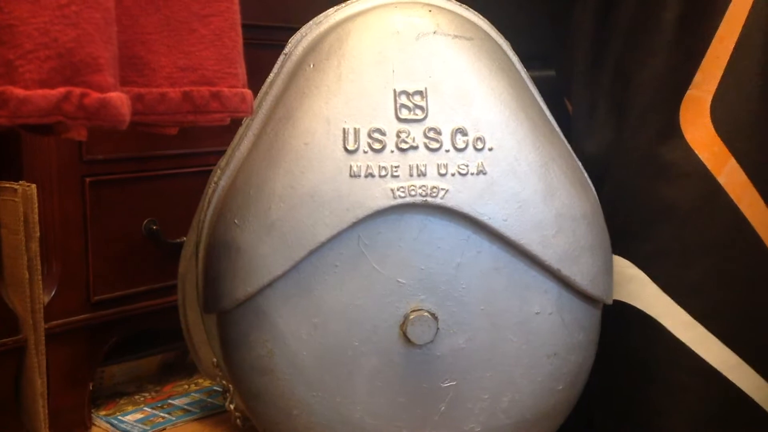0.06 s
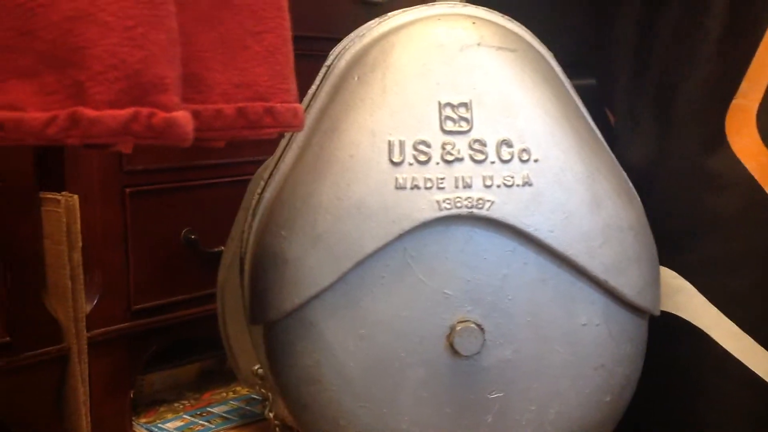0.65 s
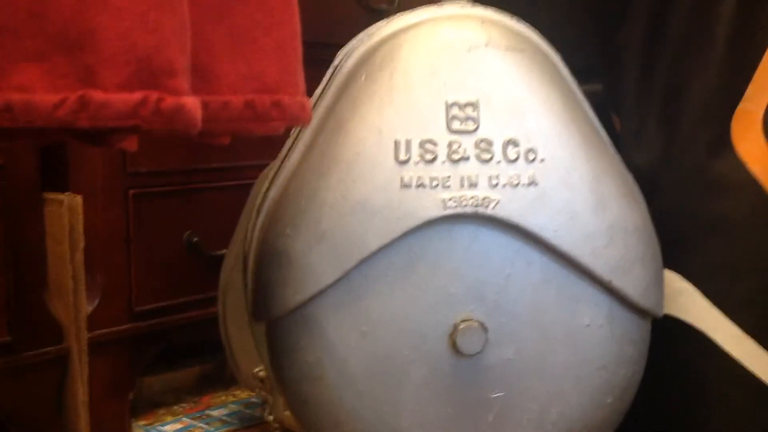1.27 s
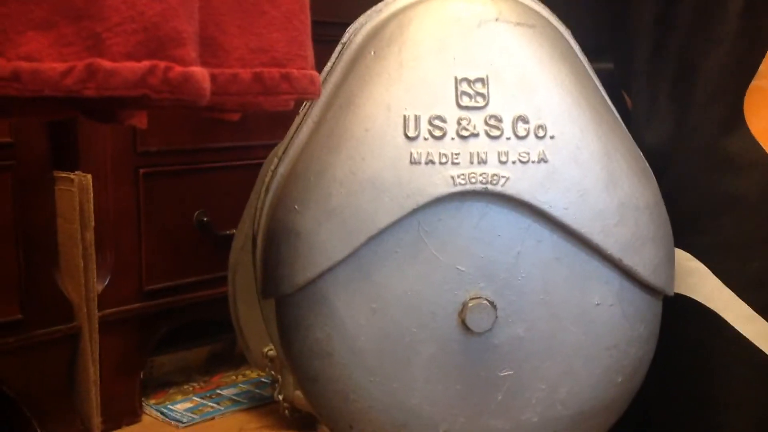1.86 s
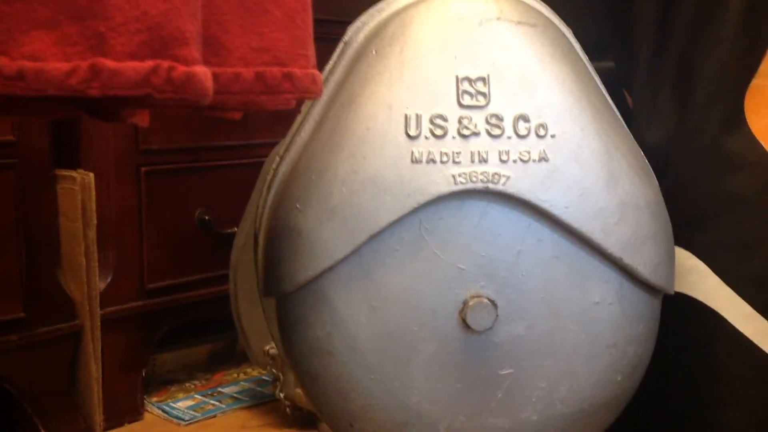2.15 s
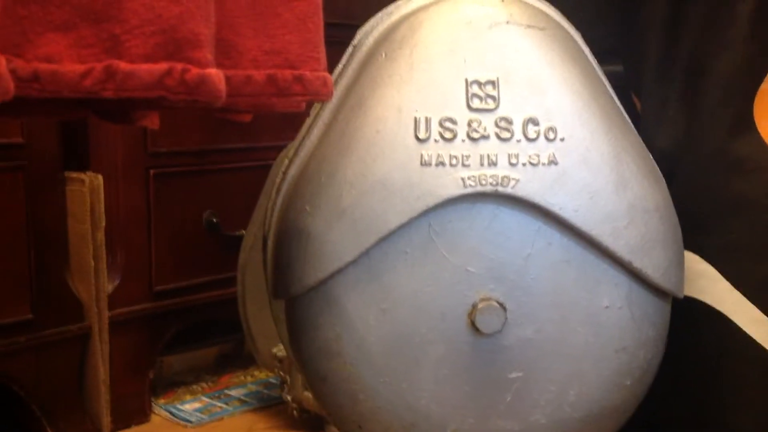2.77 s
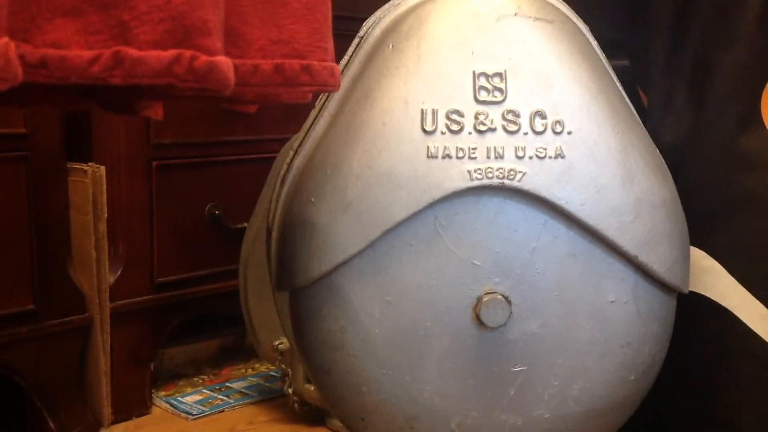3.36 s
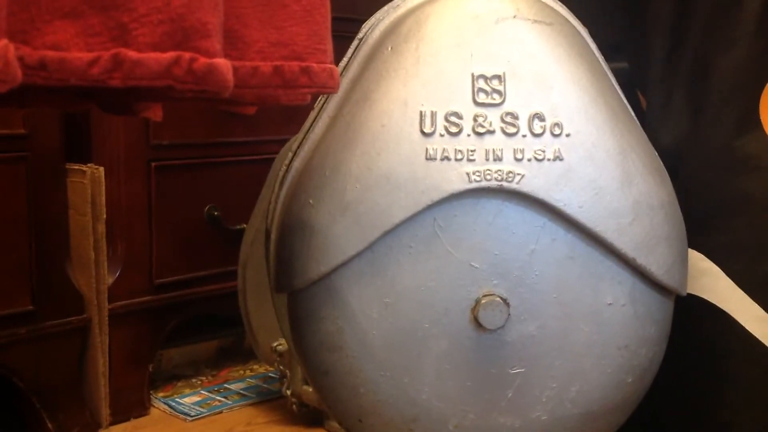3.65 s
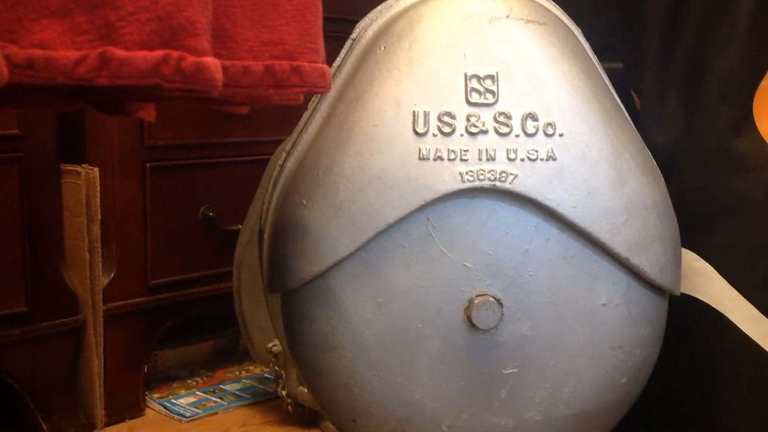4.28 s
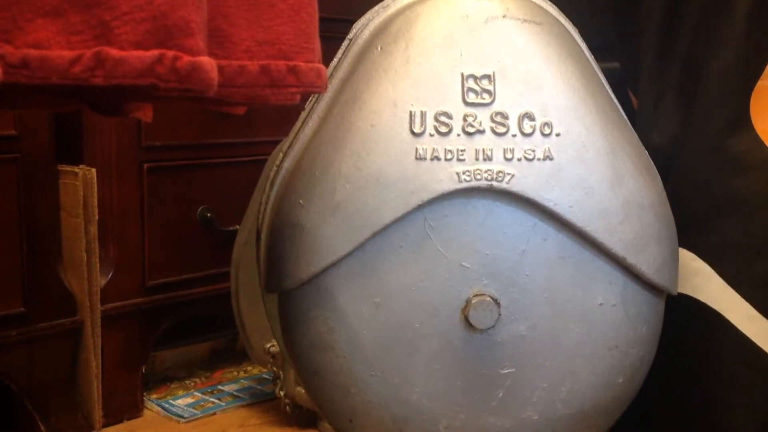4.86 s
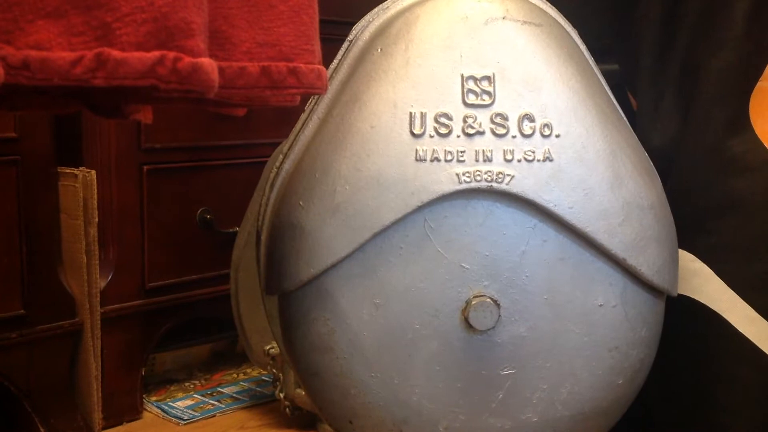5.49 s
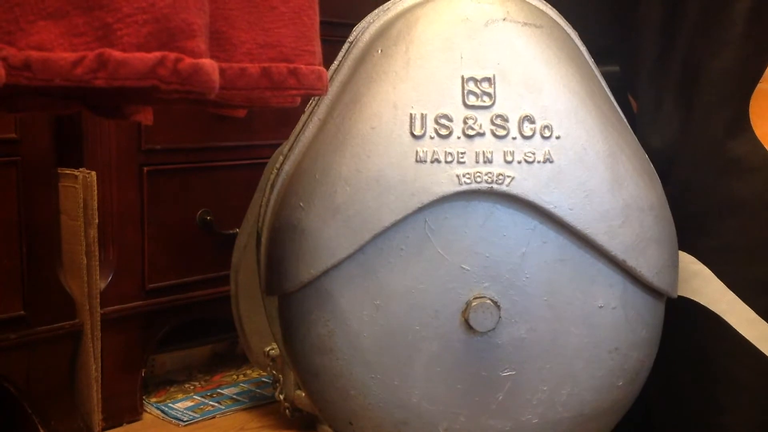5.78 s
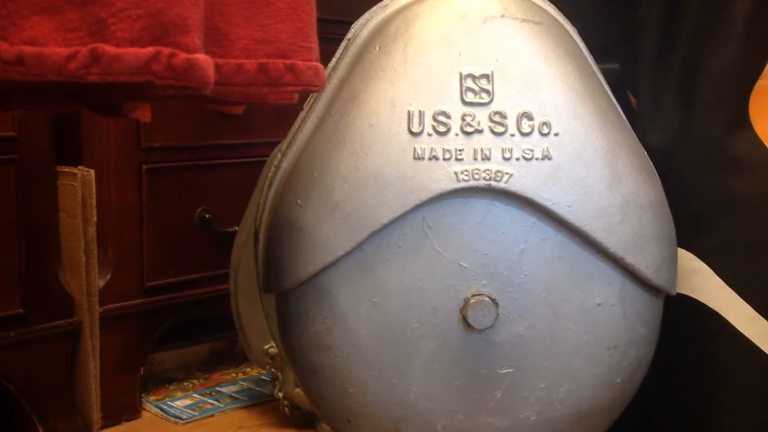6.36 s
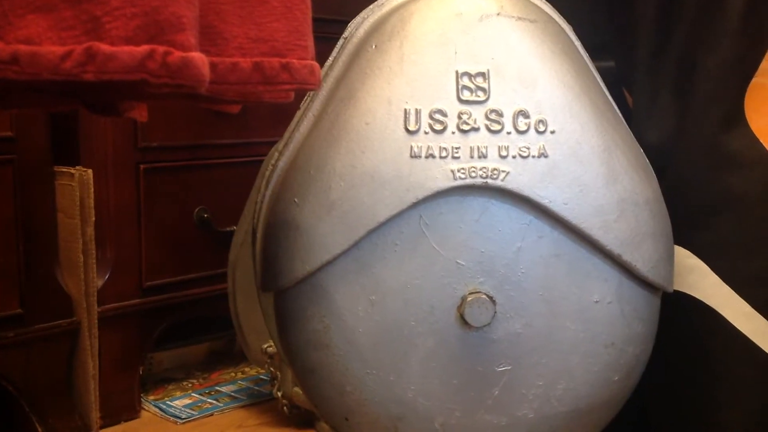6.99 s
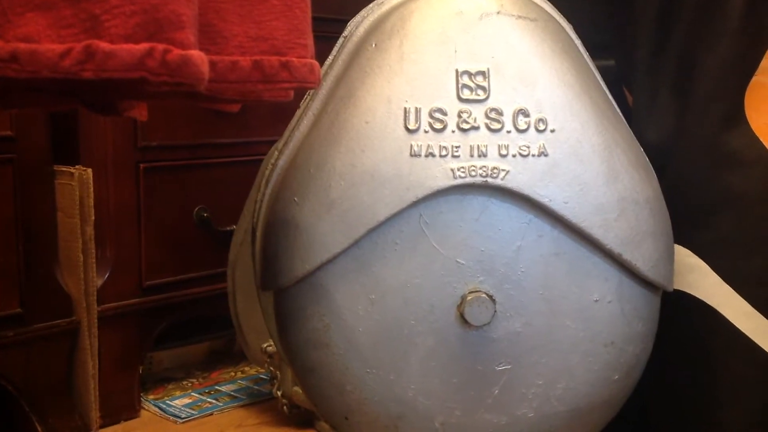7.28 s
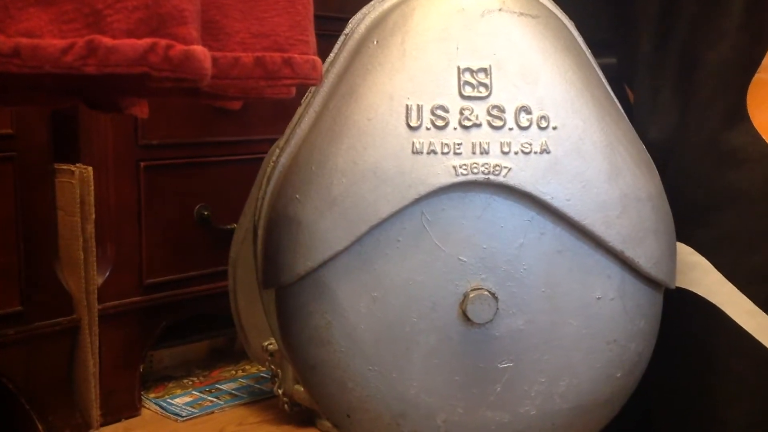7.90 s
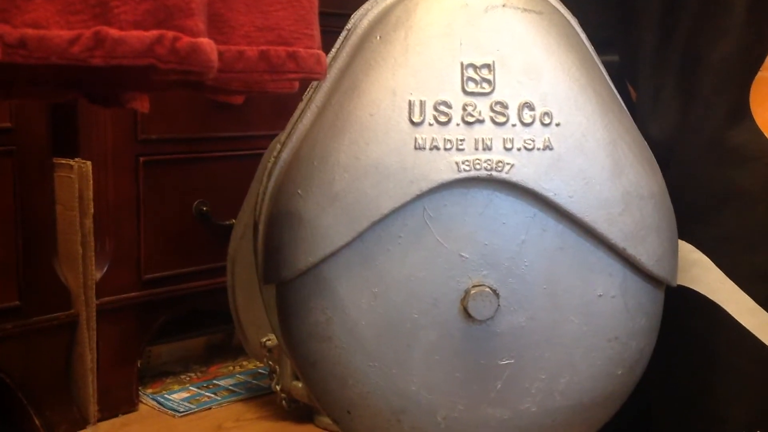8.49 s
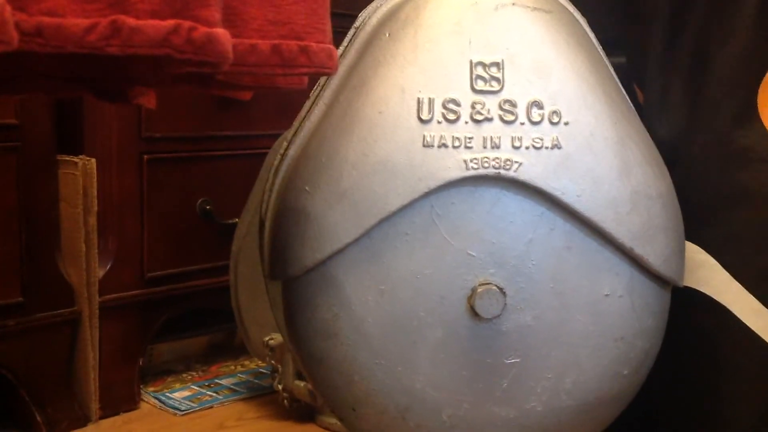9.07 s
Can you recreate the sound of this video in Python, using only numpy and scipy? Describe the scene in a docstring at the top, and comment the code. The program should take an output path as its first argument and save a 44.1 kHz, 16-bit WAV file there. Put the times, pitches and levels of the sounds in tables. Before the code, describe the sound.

A railroad crossing bell starts ringing at once, close to the microphone in a quiet furnished room. The hammer hits the metal gong evenly, about three times a second. Each blow gives a bright clang with a short room echo, and the mechanism clacks just before and after it. A deep hum runs underneath, dipping briefly under each strike. The loose linkage rattles hard at about 0.2 seconds and chatters lightly until about 1.5 seconds. The steady clanging continues, with a second hard rattle and a weaker blow near 4.9 seconds. The last strike lands at about 7.1 seconds, and the mechanism drops to rest with a softer clack near 7.9 seconds. The high ringing fades quickly, while the gong's low tone hums on, slowly wavering.

```python
"""A furnished room, one microphone close to an electromechanical railroad crossing bell.
About three times a second the armature pulls in with a clack, the hammer hits the gong and the armature
drops back; the linkage chatters at first and twice rattles hard. Each blow sets off a bright clang, which
echoes in the room, over a deep hum. The blows stop and the gong hums on, beating slowly.
A limiter behind the microphone ducks the hum under every blow."""
import sys
import numpy as np
from scipy import signal
from scipy.fft import rfft, irfft, next_fast_len
from scipy.io import wavfile
from scipy.ndimage import uniform_filter1d, minimum_filter1d

SR = 44100
rng = np.random.default_rng(int(sys.argv[2]) if len(sys.argv) > 2 else 0)


def bounce(signal):
    """Save signal as a 16-bit WAV file at the path given by the first command-line argument."""
    frames = np.transpose(np.atleast_2d(signal))
    limited = np.clip(frames, -1, 1)
    pcm = np.round(limited * 32767).astype(np.int16)
    wavfile.write(sys.argv[1], SR, pcm)


N = 407477

# colour of the quiet room: freq_hz, gain_db
ROOM_TONE_COLOUR = [(30, -64.5), (100, -58), (170, -46), (400, -51), (1000, -60), (3000, -69), (8000, -65),
                    (15000, -73)]
# how long the case and room keep a sound alive: freq_hz, t60_s
ROOM_DECAY = [(150, 0.56), (700, 0.53), (3000, 0.25), (7000, .23), (14000, 0.098)]
# two hard rattles: start_s, length_s, level_db
HARD_RATTLES = [(0.193, 0.065, 7), (4.92, 0.056, 7)]
# colour of the loose metal part that rattles: freq_hz, gain_db
LOOSE_PART_COLOUR = [(300, -42.5), (1500, -23.5), (3000, -20.5), (4200, -15), (5400, -7.5), (6600, -15),
                     (8500, -29), (12000, -30.5), (15000, -38)]
# colour of the armature pulling in: freq_hz, gain_db
PULL_IN_COLOUR = [(40, -46.5), (110, -38), (165, -21.5), (230, -31), (340, -8), (480, -37.5), (800, -26),
                  (3400, -22), (4250, -16.5), (4900, -25.5), (7000, -24), (8500, -17.5), (11000, -29.5),
                  (15000, -38.5)]
# colour of the armature dropping back: freq_hz, gain_db
DROP_BACK_COLOUR = [(40, -46), (110, -40), (165, -20), (220, -28), (320, -11.5), (480, -37), (850, -25.5),
                    (2300, -22.5), (3000, -23.5), (3800, -24.5), (5300, -20.5), (7400, -23.5), (7550, -10),
                    (7700, -21), (10000, -28), (15000, -36.5)]
# colour of the hammer meeting the gong: freq_hz, gain_db
HAMMER_COLOUR = [(40, -29.5), (110, -28), (160, -11), (210, -21), (310, -1), (500, -23), (900, -13),
                 (1450, -12.5), (1900, 1.5), (2300, -11.5), (2900, -12), (3300, -3), (3700, -6.5),
                 (5500, -2), (8000, -13), (11000, -29), (15000, -32.5)]
# each blow meets a moving rim, so it feeds or checks the deep hum and the upper ring:
# start_s, force_db, hum_db, ring_db
HAMMER_BLOWS = [(0.0342, 1, -1.5, 4), (0.3733, -2, 2, 1.5), (0.7458, -1.5, -1.5, 1.5),
                (1.0979, 0, -2.5, 1.5), (1.4543, -1.5, 4.5, -3.5), (1.8069, 0, 3.5, -2.5),
                (2.1535, 0.5, -7, 2), (2.4888, 1, -4, 0.5), (2.8329, -1, -6, -5.5), (3.1742, 3, -1, 4),
                (3.5192, 1, 0, 2), (3.88, -.5, -0.5, -1), (4.221, 0.5, 1.5, 2.5), (4.568, 1, -12, 3),
                (4.9107, -5, -11.5, -12), (5.2517, 0, -3.5, 4), (5.6215, 1, 5, -6), (6.0021, -0.5, 7, -8.5),
                (6.3656, 2.5, 0, 1.5), (6.7253, 1.5, 1, -2), (7.094, 1, 6, 6.5)]
# the gong's short bright modes, plus short-lived room resonances that each blow sets ringing near the long
# partials (1300, 1850, 1915, 2535 Hz): pitch_hz, level_db, t60_s
BRIGHT_MODES = [(1300, -17, .28), (1850, -23, .2), (1915, -20, .2), (2011, -28, .9), (2535, -18, .25),
                (3266, -4, .36), (4045, -4.5, .3), (4308, -13, .32), (4886, -9, .29), (5104, -28, .6),
                (5429, -15, .41), (5624, -14, .4), (5777, -6.5, .35), (6210, -13, .22), (6556, -18.5, .38),
                (6742, -10.5, .31), (7062, -19, .25), (7248, -5, .22), (7772, -16, .38), (7795, -14, .37),
                (7820, -10.5, .38), (8539, -9, .22), (8876, -7.5, .22), (9110, -8.5, .2), (9894, -17, .21),
                (10012, -7.5, .19), (10434, -17, .24), (11337, -18, .23), (11466, -17, .23),
                (11778, -22, .21), (12520, -20, .2), (12855, -22, .21), (13068, -16, .21),
                (13890, -22, .21), (14490, -23, .21), (14739, -23, .21)]
# the gong's five long partials, each a beating pair:
# pitch_hz, t60_s, twin_offset_hz, twin_db, twin_t60_s, blow_to_dip_s
LONG_PARTIALS = [(284.3, 18, -0.23, -2.5, 22, 1.715), (733.2, 7.9, -1.1, -7, 9, 0.012),
                 (1278.1, 1.31, -2.5, -13, 3.3, 0.04), (1885.2, 1.49, 3, -8.5, 2.27, 0.0037),
                 (2552.9, 1, -2.5, -6, 1.2, 0.0018)]
# how each long partial answers a blow: level_db, hum_share, ring_share, spread_db
PARTIAL_RESPONSE = [(-22.5, 1, 0, 1.5), (-30, 0.12, 0.5, 1.5), (-6, 0, 0, 1.8), (-10, 0, 0.55, 1.13),
                    (-11, 0, 1, 2.5)]
# slow swells of the second and third long partials: time_s, second_db, third_db
PARTIAL_SWELLS = [(0, -1.5, -4.5), (1.1, -1, -4), (2.15, 2, 4.5), (2.5, 3.5, 2.5), (3.88, 3, 2.5),
                  (4.22, -9, 3.5), (5.62, 3, -6), (6.72, -5.5, 1), (7.09, 0, -5.5)]

CYCLE_S = .353   # usual time from blow to blow
TOP_MODES_HZ, CUTOFF_HZ = 7000, 15300


def from_db(db):
    """Decibels to amplitude."""
    return 10 ** (np.asarray(db) / 20)


def fade(t, t60):
    """A decay of 60 dB in t60 seconds."""
    return np.exp(-np.log(1000) * t / max(t60, 1e-3))


def phasor(turns):
    """A point on the unit circle."""
    return np.exp(2j * np.pi * turns)


def at_hz(points, hz):
    """Read a table on a log-frequency axis."""
    freq_hz, value = np.transpose(points)
    return np.interp(np.log(np.maximum(hz, 1)), np.log(freq_hz), value)


def add(out, start_s, sound):
    """Mix a sound in from start_s on."""
    start = max(round(start_s * SR), 0)
    out[start:start + len(sound)] += sound[:N - start]


def noise(colour, size, gain=1):
    """White noise, times a gain, through a colour."""
    hz = np.arange(size // 2 + 1) * SR / size
    return irfft(rfft(gain * rng.standard_normal(size)) * from_db(at_hz(colour, hz)), size)


def room_tone():
    """The quiet room's steady noise, far below the bell."""
    return noise(ROOM_TONE_COLOUR, next_fast_len(N))[:N]


def die_away(sound):
    """Let a sound die away in the room, treble first."""
    t = np.arange(len(sound)) / SR
    hz = np.arange(len(sound) // 2 + 1) * SR / len(sound)
    centres_hz, t60s = np.transpose(ROOM_DECAY)
    shares = np.array([at_hz(np.c_[centres_hz, one], hz) for one in np.eye(len(centres_hz))])
    bands = irfft(rfft(sound) * shares, len(sound))
    return sum(band * fade(t, t60) for band, t60 in zip(bands, t60s))


def room_echoes(sound, first_echo_s):
    """Dense echoes reach the microphone off the furniture and walls."""
    size = SR // 2
    echoes = die_away(rng.standard_normal(size)) * (np.arange(size) > first_echo_s * SR)
    return signal.fftconvolve(sound, echoes / np.linalg.norm(echoes))[:N]


def linkage_rattles(drops, taps_per_s, spread_db, sag_db, ring_t60):
    """Runs of tiny taps that weaken as they go; all of them ring the same loose metal part."""
    loose_until_s, chatter_s, chatter_db = 1.4, 0.16, -10
    taps, t = np.zeros(N), np.arange(SR // 3) / SR
    decay = fade(t, ring_t60)
    part_ring = noise(LOOSE_PART_COLOUR, len(t)) * decay / np.linalg.norm(decay)
    chatter = [(s, chatter_s, chatter_db) for s, *_ in [*HAMMER_BLOWS, *drops] if s < loose_until_s]
    for start_s, length_s, level_db in HARD_RATTLES + chatter:
        hit = (rng.random(len(t)) < taps_per_s / SR) & (t < length_s) | (t == 0)
        run = hit * rng.choice([-1, 1], len(t)) * from_db(spread_db * rng.standard_normal(len(t)))
        run *= np.sqrt(length_s * SR) / np.linalg.norm(run)
        add(taps, start_s, run * from_db(level_db - sag_db * t / length_s))
    return signal.fftconvolve(taps, part_ring)[:N]


def armature_cycle():
    """The armature pulls in before each blow and drops back after it; two lists of start_s, level_db."""
    pull_lead_s, drop_after_s, drop_db_per_s = .0572, .185, 172
    rest_s, rest_db = 7.86, -7.5   # it falls to rest once the blows have stopped
    blow_s = np.array(HAMMER_BLOWS)[:, 0]
    extra_s = np.diff(blow_s) - CYCLE_S
    pull_s = blow_s - pull_lead_s + .14 * np.r_[0, extra_s]
    drop_s = blow_s + drop_after_s + .8 * np.r_[extra_s, extra_s[-1] / 2]
    drop_db = drop_db_per_s * np.r_[extra_s, 0]   # a longer swing ends in a harder drop
    pulls = np.c_[pull_s, np.zeros(len(pull_s))]
    drops = np.vstack([np.c_[drop_s, drop_db], (rest_s, rest_db)])
    return pulls, drops


def grain(size, grain_db, grain_s):
    """A gain that jumps about from one tiny collision to the next; rms 1."""
    lumps = uniform_filter1d(rng.standard_normal(size), max(round(grain_s * SR), 1))
    gain = from_db(grain_db * np.clip(lumps / lumps.std(), -2.5, 2.5))
    return gain / np.sqrt(np.mean(gain ** 2))


def steel_contacts(hits, colour, crack_db, crack_t60, tail_db, grain_db, alike):
    """Steel meets steel: a short crack, then a grainy tail; a share of the tail is alike each time."""
    out, t = np.zeros(N), np.arange(SR // 2) / SR
    body = noise(colour, len(t))
    for start_s, level_db, *_ in hits:
        crack = from_db(crack_db) * fade(t, crack_t60) * noise(colour, len(t))
        fresh = noise(colour, len(t), grain(len(t), grain_db, grain_s=0.0019))
        tail = from_db(tail_db) * die_away(np.sqrt(alike) * body + np.sqrt(1 - alike) * fresh)
        add(out, start_s, from_db(level_db) * (crack + tail))
    return out


def drive_db(hz, force_db, ring_db):
    """The lower bright modes go with a blow's ring, the top ones with its force."""
    return np.where(hz < TOP_MODES_HZ, 0.53 * ring_db, 2.1 * force_db)


def gong_weak_modes(level_db, rise_db_per_octave, pitch_spread, t60, per_mode):
    """Weak modes cluster around the bright ones, lifted towards the top, other ones on each blow."""
    out, t = np.zeros(N), np.arange(SR // 3) / SR
    hz, mode_db, _ = np.repeat(np.transpose(BRIGHT_MODES), per_mode, axis=1)
    mode_db = mode_db + level_db + rise_db_per_octave * np.log2(hz / TOP_MODES_HZ)
    for start_s, force_db, _, ring_db in HAMMER_BLOWS:
        scattered_hz = np.clip(hz * (1 + pitch_spread * rng.standard_normal(len(hz))), 0, CUTOFF_HZ)
        bins = np.round(scattered_hz * len(t) / SR).astype(int)
        spectrum = np.zeros(len(t) // 2 + 1, complex)
        spectrum[bins] = from_db(mode_db + drive_db(hz, force_db, ring_db)) * phasor(rng.random(len(hz)))
        add(out, start_s, irfft(spectrum, len(t)) * len(t) / 2 * fade(t, t60))
    return out


def gong_clang(level_db, scatter_db, twin_db, split_hz):
    """The bright modes ring anew on each blow, each at its own strength; close twins make them shimmer."""
    out, t = np.zeros(N), np.arange(SR * 2 // 3) / SR
    hz, mode_db, t60s = np.transpose(BRIGHT_MODES)
    offsets_hz = split_hz * rng.uniform(0.46, 2, len(hz))
    shimmer = np.array([1 + from_db(twin_db) * phasor(f * t + rng.random()) for f in offsets_hz])
    rings = shimmer * np.array([fade(t, t60) * phasor(f * t) for f, t60 in zip(hz, t60s)])
    for start_s, force_db, _, ring_db in HAMMER_BLOWS:
        strength_db = mode_db + drive_db(hz, force_db, ring_db) + scatter_db * rng.standard_normal(len(hz))
        struck = from_db(strength_db + level_db) * phasor(rng.random(len(hz)))
        add(out, start_s, np.imag(struck @ rings))
    return out


def gong_hum(level_db, settle_s, twin_spread_db, dip_spread_turns):
    """Every blow restarts the long partials at a new level and phase; each beats with its twin."""
    blow_s, _, hum_db, ring_db = np.transpose(HAMMER_BLOWS)
    swells = np.transpose(PARTIAL_SWELLS)
    out, t = np.zeros(N), np.arange(N) / SR
    coarse_t = t[::16]
    latest_blow = np.maximum(np.searchsorted(blow_s, coarse_t) - 1, 0)
    age_s = coarse_t - blow_s[latest_blow]
    age_s = np.where(age_s < 0, age_s + CYCLE_S, age_s)   # the gong is already ringing at the start
    pole = np.exp(-coarse_t[1] / settle_s)
    for k, (hz, t60, offset_hz, twin_db, twin_t60, dip_s) in enumerate(LONG_PARTIALS):
        mean_db, hum_share, ring_share, spread_db = PARTIAL_RESPONSE[k]
        # chance varies every blow but the last, which rings out plainly
        luck, twin_luck, dip_luck = rng.standard_normal((len(blow_s), 3)).T * (blow_s < blow_s[-1])
        struck_db = level_db + mean_db + hum_share * hum_db + ring_share * ring_db + spread_db * luck
        if k in (1, 2):
            struck_db += np.interp(blow_s, swells[0], swells[k])
        struck = from_db(struck_db) * phasor(rng.random(len(blow_s)))
        unsteady = min(abs(offset_hz) * CYCLE_S, 1)   # only quick beats change within a cycle
        twin_gain = from_db(twin_db + unsteady * twin_spread_db * twin_luck)
        twin_start = twin_gain * phasor(unsteady * dip_spread_turns * dip_luck)
        twin = twin_start[latest_blow] * fade(age_s, twin_t60) * phasor(offset_hz * (age_s - dip_s))
        beating = struck[latest_blow] * (fade(age_s, t60) - twin)
        envelope = signal.lfilter([1 - pole], [1, -pole], beating)
        out += np.real(np.interp(t, coarse_t, envelope) * phasor(hz * t))
    return out


def scene():
    """Gong, hammer and armature close up, the quiet room behind them; mono."""
    pull_hits, drop_hits = armature_cycle()
    hum = gong_hum(level_db=1, settle_s=0.0074, twin_spread_db=3.5, dip_spread_turns=0.28)
    clang = gong_clang(level_db=-1.5, scatter_db=3.5, twin_db=-9.5, split_hz=12)
    clang += gong_weak_modes(level_db=-17, rise_db_per_octave=1.5, pitch_spread=0.012, t60=0.32, per_mode=3)
    echoes = from_db(-10.5) * room_echoes(clang, first_echo_s=.01)
    hammer = steel_contacts(HAMMER_BLOWS, HAMMER_COLOUR, crack_db=11.5, crack_t60=0.065,
                            tail_db=-1.5, grain_db=1.5, alike=.2)
    pulls = steel_contacts(pull_hits, PULL_IN_COLOUR, crack_db=-3, crack_t60=.035,
                           tail_db=1.1, grain_db=1.5, alike=.5)
    drops = steel_contacts(drop_hits, DROP_BACK_COLOUR, crack_db=0, crack_t60=0.11,
                           tail_db=1.5, grain_db=-2.0, alike=0.45)
    rattles = linkage_rattles(drop_hits, taps_per_s=240, spread_db=2.5, sag_db=9.5, ring_t60=0.12)
    return (room_tone() + echoes + rattles + pulls + drops + hammer + clang + hum)[None]


def limiter(x, ceiling_db, release_db_per_s, window_s, hold_s):
    """The gain falls at once when the level passes the ceiling, holds, and returns at a steady rate."""
    window, hold = max(round(window_s * SR), 2), max(round(hold_s * SR), 1)
    level_db = 10 * np.log10(np.maximum(uniform_filter1d(x ** 2, window), 1e-12))
    over_db = -minimum_filter1d(np.minimum(ceiling_db - level_db, 0), hold, origin=(hold - 1) // 2)
    release_db = release_db_per_s * np.arange(N) / SR
    cut_db = np.maximum.accumulate(over_db + release_db, axis=-1) - release_db
    return x * from_db(-uniform_filter1d(cut_db, window // 2))


def record(dry):
    """Behind the microphone the limiter holds the level, peaks are rounded and the top is cut."""
    held = limiter(dry, ceiling_db=-12.5, release_db_per_s=182.5, window_s=.003, hold_s=0.0046)
    rounded = held / (1 + (held / .63) ** 8) ** (1 / 8)
    lowpass = signal.ellip(8, .1, 45, CUTOFF_HZ, fs=SR, output="sos")
    return signal.sosfiltfilt(lowpass, rounded)


dry = scene()
out = record(dry)
bounce(out)
```